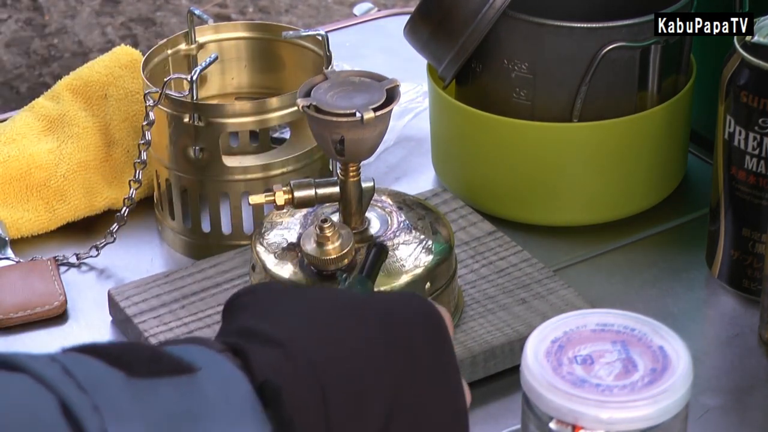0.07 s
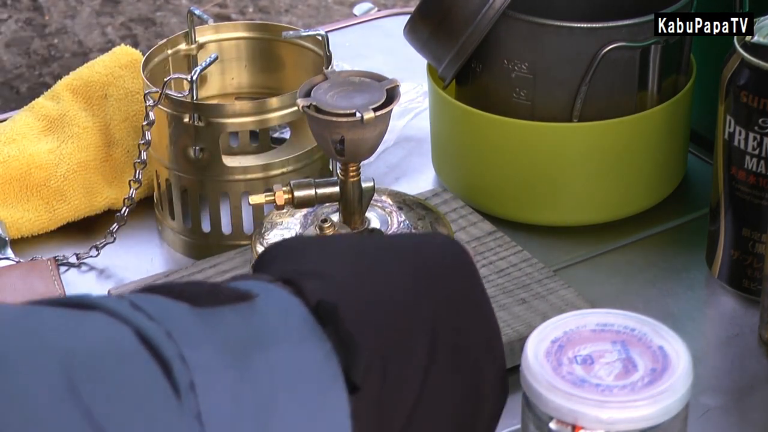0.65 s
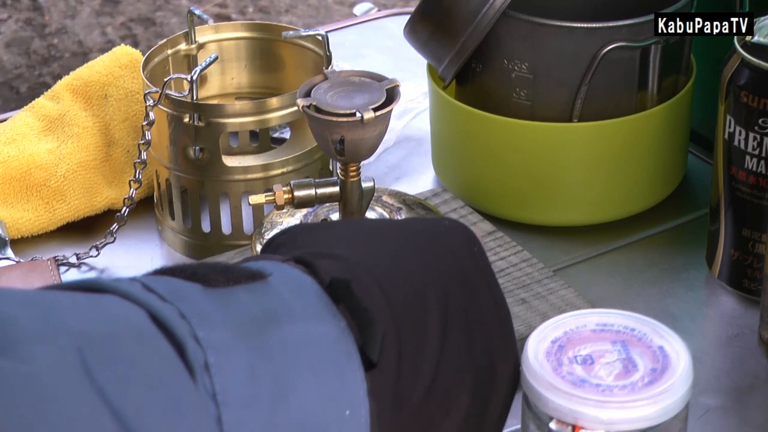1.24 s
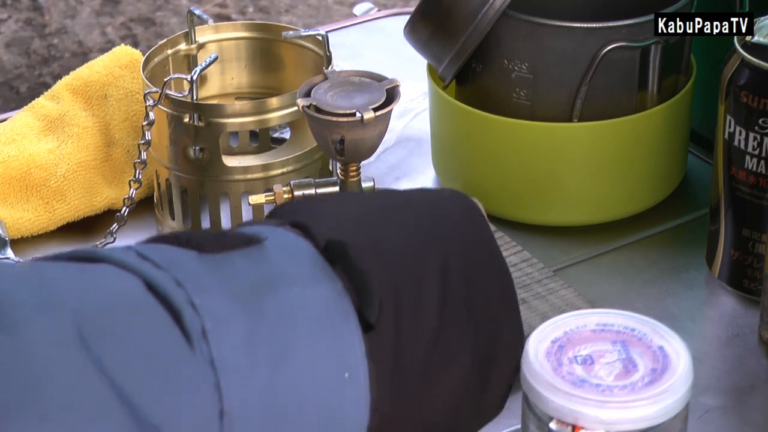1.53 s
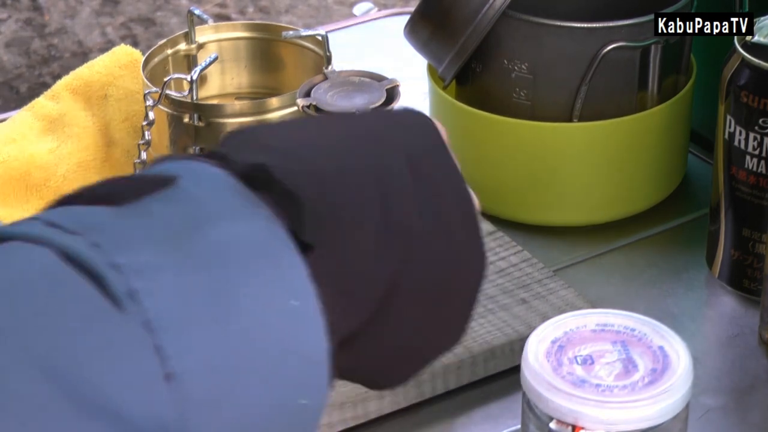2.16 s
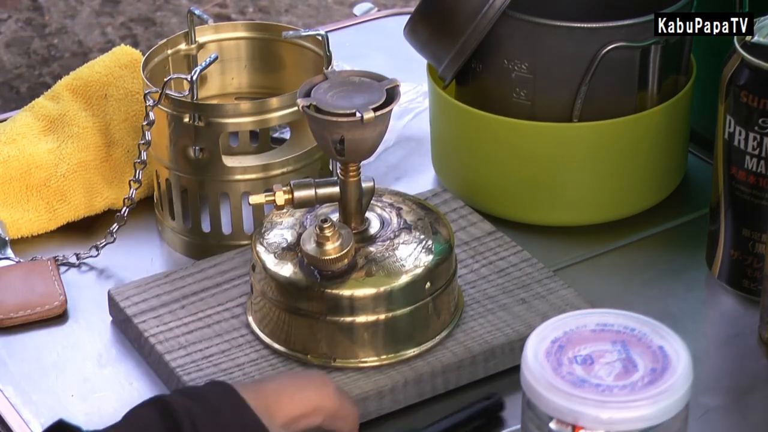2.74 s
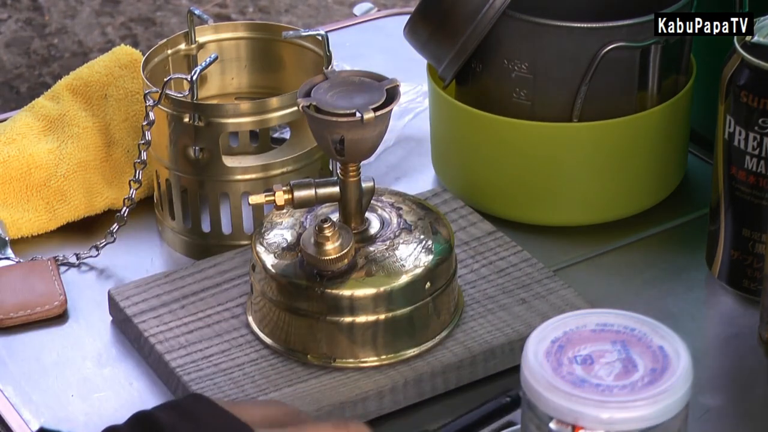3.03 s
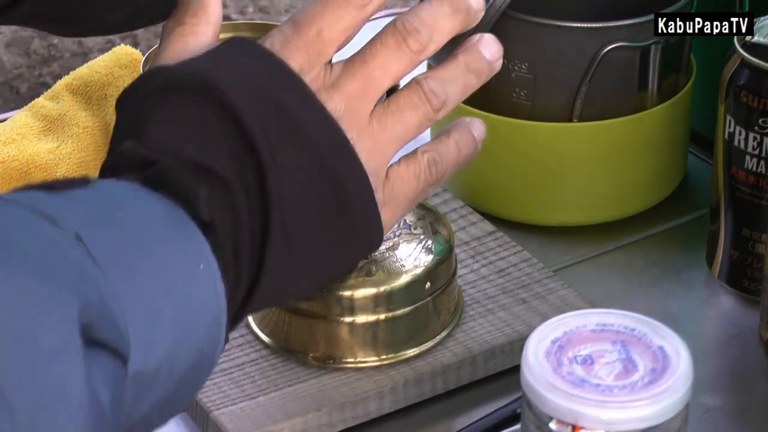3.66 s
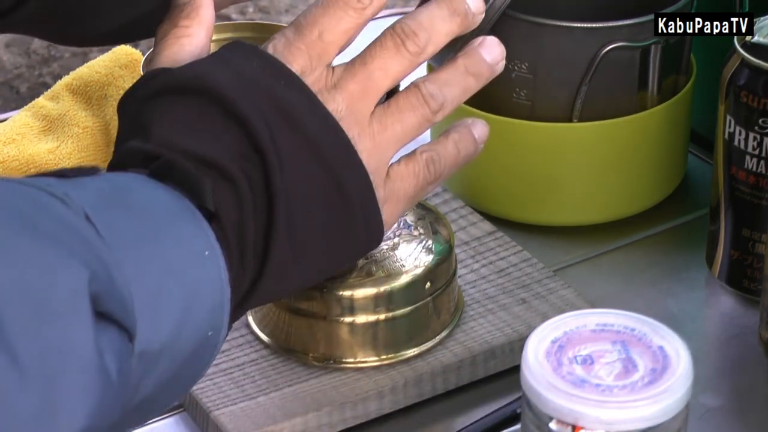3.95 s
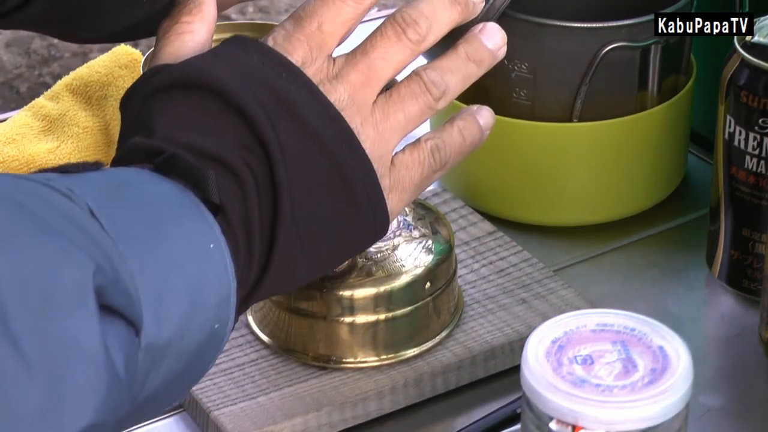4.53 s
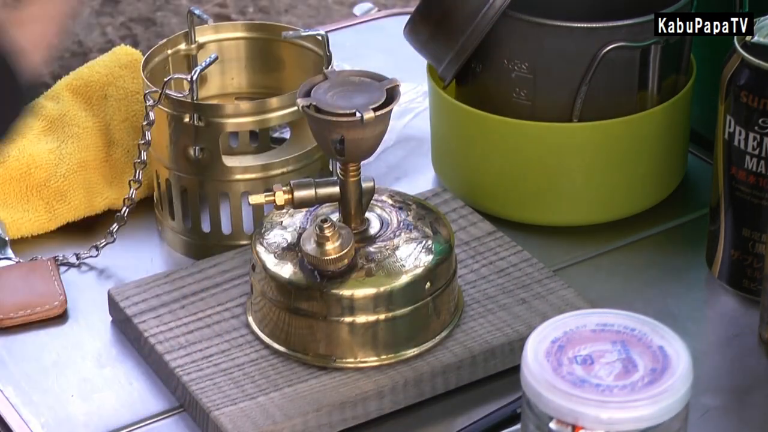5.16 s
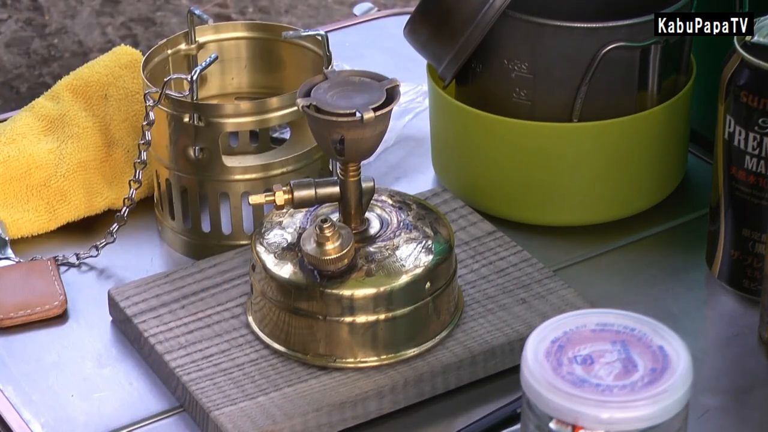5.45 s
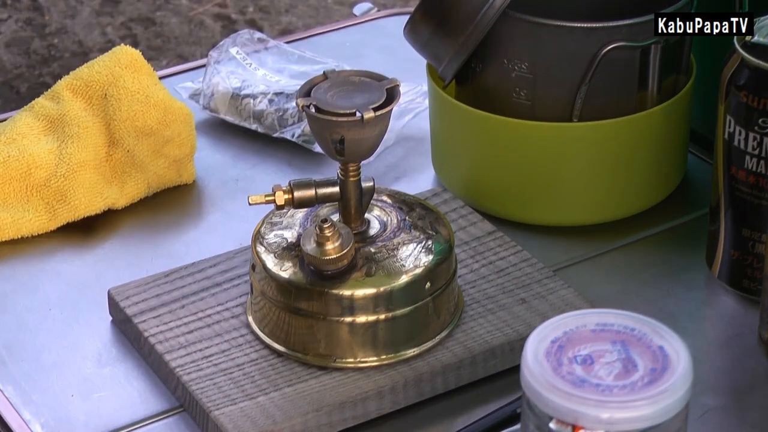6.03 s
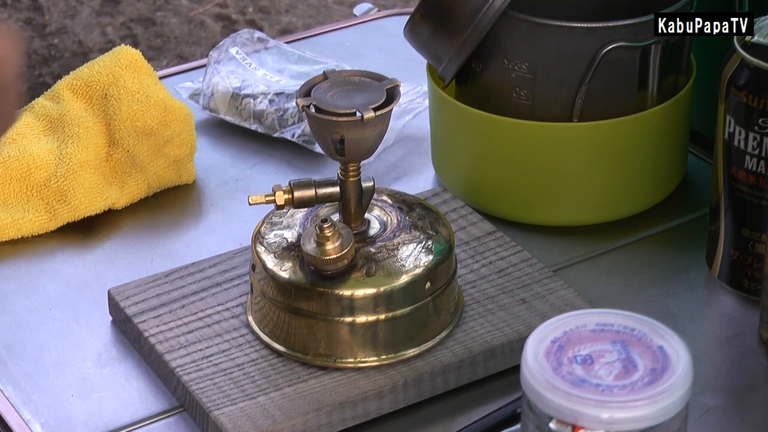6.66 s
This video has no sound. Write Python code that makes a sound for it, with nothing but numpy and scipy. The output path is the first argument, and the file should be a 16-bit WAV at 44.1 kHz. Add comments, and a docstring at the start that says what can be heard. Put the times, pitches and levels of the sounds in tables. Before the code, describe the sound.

Light metal taps, one sharp lighter click, plastic clattering onto a table and close sleeve rustling, with steady low outdoor air behind.

```python
"""Outdoors, at a table with a brass camping stove, a low, steady rush lies under everything.
A long plastic lighter tinks against the burner with its metal nozzle, snaps once as its hammer strikes,
and later its trigger springs back. It is put down, slid along and let go, and a few knocks make the
table ring. A jacket sleeve swishes, cloth rubbing on cloth, with each reach of the arm.
It all sounds close by and almost the same in both ears."""
import sys
import numpy as np
from scipy import signal
from scipy.fft import rfft, irfft, next_fast_len
from scipy.io import wavfile

SR = 44100
rng = np.random.default_rng(int(sys.argv[2]) if len(sys.argv) > 2 else 0)


def file_out(sig):
    """Save sig as 16-bit WAV at sys.argv[1]."""
    # one column per channel
    cols = np.atleast_2d(sig).T
    # limit, then scale
    lim = np.clip(cols, -1, 1)
    pcm = np.round(lim * 32767).astype(np.int16)
    wavfile.write(sys.argv[1], SR, pcm)


N = 303849
TIME = np.arange(N) / SR
HIT_TIME = TIME[:SR // 2]  # half a second for each hit to ring out


def amp(db):
    """Turns decibels into a number to multiply a sound by."""
    return 10 ** (np.asarray(db) / 20)


def unit(x):
    """Scales a signal so that its average strength (rms) is 1."""
    return x / np.sqrt(np.mean(x ** 2) + 1e-20)


def level_at(spectrum, hz):
    """Reads the level in dB at any pitch from rows of pitch_hz, level_db."""
    pitches, levels = np.transpose(spectrum)
    return np.interp(np.log(hz + 1), np.log(pitches + 1), levels)


def add(mix, start_s, sound):
    """Lays a sound into the mix at its start time."""
    part = mix[round(start_s * SR):][:len(sound)]
    part += sound[:len(part)]


def noise(spectrum, size, tilt_db=0):
    """Noise shaped by a spectrum; a positive tilt, in dB per octave, makes it brighter."""
    padded = next_fast_len(size, True)
    hz = np.fft.rfftfreq(padded, 1 / SR)
    octaves = np.log2(np.maximum(hz, spectrum[1][0]))
    gain = amp(level_at(spectrum, hz) + tilt_db * octaves)
    return unit(irfft(rfft(rng.standard_normal(padded)) * gain, padded)[:size])


def band(pitch_hz, half_width_hz):
    """Noise gathered around one pitch: the narrower it is, the more it sounds like a note."""
    padded = next_fast_len(N, True)
    hz = np.fft.rfftfreq(padded, 1 / SR)
    peak = 1 / (1 + ((hz - pitch_hz) / half_width_hz) ** 2)
    return unit(irfft(rfft(rng.standard_normal(padded)) * peak, padded)[:N])


def wobble(rate_hz):
    """A curve that wanders up and down at random, faster at a higher rate."""
    points = rng.standard_normal(N // 16)
    return unit(np.interp(2 * rate_hz * TIME, np.arange(len(points)), points))


def dying(fade_s):
    """A fade that falls by 60 dB in fade_s seconds."""
    return np.exp(-np.log(1000) * HIT_TIME / max(fade_s, 1e-4))


def ring(tones, fade_scale=1, spread_db=2.5):
    """A struck thing rings with its own tones; where it is hit sets each one's sign and strength."""
    out = np.zeros(len(HIT_TIME))
    for hz, db, fade_s in tones:
        strength = rng.choice([-1, 1]) * amp(db + spread_db * rng.standard_normal())
        out += strength * dying(fade_s * fade_scale) * np.sin(2 * np.pi * hz * HIT_TIME)
    return out


def burst(spectrum, fade_s, tilt_db=0):
    """A dying puff of noise whose energy depends only on how long it lasts."""
    fade = dying(fade_s)
    return unit(noise(spectrum, len(fade), tilt_db) * fade) * np.sqrt(np.mean(fade ** 2))


# The tone colour of the outdoor air: pitch_hz, level_db
AIR_SPECTRUM = [(12, -24), (25, -2.5), (55, 0), (120, -3.5), (180, -6.5), (270, -9.5), (420, -13),
                (720, -12.5), (980, -14.5), (1500, -23.5), (3000, -30.5), (6000, -35.5), (10000, -38.5),
                (16000, -42)]
# Two low hums: pitch_hz, half_width_hz, level_db
DRONES = [(94, 12.5, -55.5), (212.7, 9.1, -57)]
# How the first, nearest hum swells and fades: time_s, change_db
DRONE_SWELL = [(0, 2), (.9, 5), (1.35, 7.5), (2.2, -3.5), (3.4, 3), (4.2, 6.5), (5.2, 8), (5.9, -5),
               (6.9, -3)]

def air(rush_db=-42.5, waver_db=0.5):
    """A far-off rush that wavers a little, with two low hums in it."""
    drones = [amp(db) * band(hz, half_width) for hz, half_width, db in DRONES]
    drones[0] *= amp(np.interp(TIME, *np.transpose(DRONE_SWELL)))
    rush = amp(rush_db + waver_db * wobble(4.2)) * noise(AIR_SPECTRUM, N)
    return rush + sum(drones)


def side_hiss(level_db=-72.5):
    """A very faint hiss that gives the air a little width."""
    spectrum = [(30, 11), (120, -3), (400, 1), (1200, -21), (2500, -13),
                (4500, -0.5), (8000, 9.5), (14000, 12), (16000, 6)]
    return amp(level_db) * noise(spectrum, N)


def gear_echo(sound, echo_db=-25, fade_s=0.45):
    """Sound bounces off nearby pots and gear, which adds a faint, short tail."""
    spectrum = [(100, 7), (3000, -1.5), (8000, -7.5), (16000, -9)]
    build_up = 1 - dying(0.027)
    tail = noise(spectrum, len(HIT_TIME)) * dying(fade_s) * build_up
    return sound + amp(echo_db) * signal.fftconvolve(sound, tail / np.linalg.norm(tail))[:N]


def table_echo(sound, strength=0.22, delay_s=0.001404, sway=0.227):
    """The sleeve's sound bounces off the table; the path shifts as the arm moves, and so does the tone."""
    moving_delay_s = delay_s * np.exp(sway * wobble(1.5))
    echo = np.interp(TIME - moving_delay_s, TIME, sound)
    return (sound + strength * echo) / np.sqrt(1 + strength ** 2)


def swish(full_speed_s, rise_s, hold_s, fall_s, drop_db=17.5, curve=1.3):
    """The loudness of a short reach: the arm speeds up, glides and slows down."""
    before = np.maximum(full_speed_s - TIME, 0) / rise_s
    after = np.maximum(TIME - full_speed_s - hold_s, 0) / fall_s
    return amp(-drop_db * np.minimum(before + after, 2) ** curve)


def pull(times_s, levels_db, fade_db_per_s=450):
    """The loudness of a longer move: it follows the given levels and fades fast at both ends."""
    outside_s = abs(TIME - np.clip(TIME, times_s[0], times_s[-1]))
    return amp(np.interp(TIME, times_s, levels_db) - fade_db_per_s * outside_s)


# Short reaches of the arm: full_speed_s, rise_s, hold_s, fall_s, rub_db, hiss_db
SWISHES = [(0, .1, 0.37, 0.35, -50.5, -57.5), (0.366, 0.12, 0.12, 0.28, -48.5, -57),
           (0.637, 0.15, 0.095, 0.33, -45.5, -58), (1.535, 0.028, 0.0088, 0.041, -50, -72),
           (1.65, .08, 0.13, 0.29, -52.5, -70), (1.96, 0.037, .01, 0.026, -51.5, -70),
           (2.555, 0.12, 0.044, 0.12, -46, -56), (2.784, 0.27, 0.084, 0.086, -41.5, -50),
           (2.95, .1, 0.23, 0.17, -54.5, -58.5), (3.599, 0.16, 0.043, 0.25, -44.5, -46),
           (6.648, 0.095, .03, 0.34, -44, -46.5), (6.719, 0.042, 0.016, 0.12, -40.5, -55),
           (6.858, 0.12, .03, .1, -52, -48.5)]
# The arm pulls away from the stove: time_s, level_db
PULL_AWAY = [(2.06, -46), (2.254, -36), (2.302, -27.5), (2.354, -26), (2.456, -37.5), (2.47, -51)]
# The arm lifts the windscreen off: time_s, rub_db, hiss_db
LIFT_OFF = [(4.88, -60, -60.5), (5.074, -43, -48.5), (5.18, -41, -49), (5.328, -43.5, -47.5),
            (5.364, -36.5, -50), (5.462, -42, -46.5), (5.522, -38.5, -45), (5.746, -44.5, -46),
            (5.81, -52.5, -59)]

def arm(away_rub_db=-1, away_hiss_db=-13):
    """All the arm's moves together set how loudly the sleeve rubs and hisses at each moment."""
    away = pull(*np.transpose(PULL_AWAY))
    lift_s, lift_rub_db, lift_hiss_db = np.transpose(LIFT_OFF)
    rubs = [amp(away_rub_db) * away, pull(lift_s, lift_rub_db)]
    hisses = [amp(away_hiss_db) * away, pull(lift_s, lift_hiss_db)]
    for *timing, rub_db, hiss_db in SWISHES:
        speed = swish(*timing)
        rubs.append(amp(rub_db) * speed)
        hisses.append(amp(hiss_db) * speed)
    return np.linalg.norm(rubs, axis=0), np.linalg.norm(hisses, axis=0)


# The tone colour of rubbing cloth: pitch_hz, level_db
RUB_SPECTRUM = [(100, -24), (250, 1.5), (480, -1.5), (870, 2.5), (1150, -1), (1550, -0.5), (2000, -3.5),
                (3100, -5.5), (5000, -14.5), (9000, -24.5), (16000, -47)]
# The tone colour of its fine hiss: pitch_hz, level_db
HISS_SPECTRUM = [(1000, -23), (3000, -3), (5000, 0.5), (8000, -4), (10500, -9.5), (13000, -14.5),
                 (16000, -21.5)]
# Pitches that the folds boost or soften in a fast stroke: pitch_hz, width_hz, change_db
FOLDS = [(960, 150, 9), (1420, 260, 10), (2800, 160, 6.5), (300, 450, -12.5), (3200, 590, -3.5)]

def sleeve(slow_db=2.5, fast_db=2, fast_above_db=-35, blend_db=3, grain_db=-0.3, catch_db=1):
    """Cloth slides on cloth: threads catch unevenly, and a fast stroke sounds the hollow folds."""
    rub_gain, hiss_gain = arm()
    hz = np.geomspace(50, SR / 2, num=400)
    folds_db = sum(db / (1 + (2 * (hz - pitch) / width) ** 2) for pitch, width, db in FOLDS)
    hollow_spectrum = np.c_[hz, level_at(RUB_SPECTRUM, hz) + folds_db]
    # A louder stroke counts as a faster one: 0 is slow, 1 is fast.
    fast_share = 1 / (1 + np.exp((fast_above_db - 20 * np.log10(rub_gain)) / blend_db))
    slow_rub = amp(slow_db) * np.sqrt(1 - fast_share) * noise(RUB_SPECTRUM, N)
    fast_rub = amp(fast_db) * np.sqrt(fast_share) * noise(hollow_spectrum, N)
    threads = unit(amp(grain_db * wobble(420) + catch_db * wobble(40)))
    cloth = rub_gain * (slow_rub + fast_rub) + hiss_gain * noise(HISS_SPECTRUM, N)
    return table_echo(threads * cloth)


# How loud the lighter is as it slides on the table: time_s, level_db
SLIDE_LEVELS = [(2.64, -75), (2.655, -43), (2.69, -43), (2.73, -50), (2.8, -38.5), (2.86, -58), (2.9, -80)]
# The pitches at which its tube sings: pitch_hz, width_hz, level_db
TUBE_TONES = [(1390, 700, 1), (2920, 54, 4), (4250, 380, -2.5), (5100, 770, -3.5), (7040, 210, -7),
              (8270, 350, -7), (10900, 980, -13.5), (14300, 1500, -19)]

def slide(waver_db=4, slips_per_s=650, slip_db=2, slip_fade_s=0.0224):
    """Tiny slips keep the lighter's tube singing as it is pushed along, now one pitch, now another."""
    song = unit(sum(amp(db + waver_db * wobble(25)) * np.sqrt(width) * band(hz, width / 2)
                    for hz, width, db in TUBE_TONES))
    slip_starts = rng.random(N) < slips_per_s / SR
    slips = slip_starts * amp(slip_db * np.minimum(rng.exponential(1, N), 4))
    # Energy is the signal squared, so it fades in half the time.
    energy = signal.oaconvolve(slips ** 2, dying(slip_fade_s / 2))[:N]
    roughness = unit(np.sqrt(abs(energy)))
    level_db = np.interp(TIME, *np.transpose(SLIDE_LEVELS), left=-120, right=-120)
    return song * roughness * amp(level_db)


def bounces(start_s, count, first_gap_s=0.013, gap_scale=0.875, drop_db=-8.5, pitch_scale=0.66):
    """A hit, then duller bounces that come ever sooner and softer: start_s, change_db, pitch_scale."""
    yield start_s, 0, 1
    for k in range(count):
        start_s += first_gap_s * gap_scale ** k
        yield start_s, drop_db - k, pitch_scale  # each further bounce is 1 dB softer


# Knocks on the table: start_s, thud_db, pitch_hz, clatter_db, clatter_tilt_db_per_octave, bounce_count
KNOCKS = [(2.152, -33.5, 405, -53, -6, 0), (2.6422, -33, 1480, -26.5, 0, 0),
          (2.647, -23.5, 275, -25, -2, 0), (2.8632, -26, 360, -32.5, -2.5, 0),
          (2.8655, -26, 1000, -40, 1, 1), (3.055, -34.5, 1960, -31.5, -14, 0),
          (3.1347, -55, 2000, -42.5, 0, 0), (3.1489, -23, 1210, -32, 2, 0),
          (3.1584, -18, 450, -24.5, -1.7, 6), (5.074, -28.5, 560, -43, -6, 1), (5.409, -29, 380, -45, 0, 0),
          (5.543, -31, 520, -38, -4, 0)]
# The tones of the table top: pitch_hz, level_db, fade_s
TABLE_TONES = [(135, -7, 0.17), (177, -15, 0.16), (224.4, -4.5, 0.27), (331, 2, 0.055), (451, -4, 0.047),
               (542.4, 0, 0.072), (634, -6.5, 0.072), (896, -7, 0.075), (1040, -1.5, 0.08),
               (1382, -4.5, 0.11), (1510, -9, 0.17), (1700, -5.5, .07), (1920, -8, 0.1), (2280, 1, 0.051)]
# The tone colour of plastic clattering on it: pitch_hz, level_db
CLATTER_SPECTRUM = [(200, -10), (1000, 2), (1700, -1), (2250, 5.5), (2900, 2), (4500, 0.5), (6000, -2),
                    (8500, -3), (11000, -4.5), (13500, -16), (16000, -24)]

def table_knocks(ring_db=-4, focus_db=5, bump_db=-7, bump_fade_s=0.11, clatter_fade_s=0.053):
    """Each knock wakes the table's tones near its own pitch, while the plastic clatters on top."""
    out = np.zeros(N)
    for first_s, thud_db, pitch_hz, clatter_db, tilt_db, bounce_count in KNOCKS:
        for start_s, change_db, pitch_scale in bounces(first_s, bounce_count):
            hit_hz = pitch_hz * pitch_scale
            tones = [(hz, db - focus_db * np.log2(hz / hit_hz) ** 2, fade_s)
                     for hz, db, fade_s in TABLE_TONES]
            bump_spectrum = [(hit_hz / 10, -18), (hit_hz, 0), (hit_hz * 2, -7), (hit_hz * 20, -55)]
            bump = amp(bump_db) * burst(bump_spectrum, bump_fade_s)
            thud = amp(thud_db) * (amp(ring_db) * ring(tones) + bump)
            clatter = amp(clatter_db) * burst(CLATTER_SPECTRUM, clatter_fade_s, tilt_db)
            add(out, start_s, amp(change_db) * (thud + clatter))
    return out


# The metal nozzle touches the burner: start_s, level_db, fade_scale (above 1 rings longer)
TINKS = [(0.4103, -35.5, 1.2), (0.509, -48.5, 1), (0.628, -35, 1.3), (.6964, -36, 0.83), (.8021, -47, .4),
         (.9059, -43.5, 0.96), (.9373, -50.5, .7), (.947, -48, .6), (1.1262, -41, 0.8)]
# The tones of the nozzle: pitch_hz, level_db, fade_s
NOZZLE_TONES = [(3410, -13, .045), (3670, -10, 0.11), (4540, -9, 0.088), (5160, -11, 0.058),
                (6100, -0.5, 0.084), (6380, -2, 0.13), (7260, -5, .055), (8350, -13, 0.074),
                (8800, -8, .04), (9170, -8, 0.027), (11850, -22, .09)]
# The tone colour of the lighter's clicks, both tinks and snaps: pitch_hz, level_db
CLICK_SPECTRUM = [(150, -43), (400, -30), (1300, -34), (1660, -14), (2000, 0), (5100, 8.5), (6000, -4),
                  (7100, 6), (9600, 4.5), (11500, -7), (14000, -2), (16500, -31)]

def nozzle_tinks(tick_db=-1, tick_fade_s=0.04, pitch_spread=0.0081):
    """Metal taps metal: a tick and a high ring, a little different at each spot that is touched."""
    out = np.zeros(N)
    for start_s, level_db, fade_scale in TINKS:
        tones = [(hz * (1 + pitch_spread * rng.standard_normal()), db, fade_s)
                 for hz, db, fade_s in NOZZLE_TONES]
        metal = ring(tones, fade_scale, spread_db=-0.5)
        tick = amp(tick_db) * burst(CLICK_SPECTRUM, tick_fade_s, tilt_db=-0.5)
        add(out, start_s, amp(level_db) * (metal + tick))
    return out


# The snap, then the trigger's return: start_s, level_db, tilt_db_per_octave, ring_share
SNAPS = [(1.0056, -9.5, -6, 0.63), (1.0074, -3, 2.5, 0.71), (1.0112, -20, -11, 0.49), (1.019, -22.5, 2, .5),
         (1.026, -30, 3, .5), (2.132, -25, 0, 0.6), (2.134, -21.5, 3.5, 0.63), (2.14, -36, 4, .5)]
# The tones of the plastic case: pitch_hz, level_db, fade_s
CASE_TONES = [(2097, -2.5, 0.045), (2556, 7, 0.029), (2920, -10.5, .045), (3490, 0, 0.059), (4320, -8, .04),
              (4100, -9, 0.067), (4940, -4, 0.034), (5180, 1, 0.035), (5400, 0, 0.028), (6080, -9, 0.064),
              (7020, -2, 0.069), (8400, -14, 0.028), (8870, 0, .035), (9500, 1, 0.05), (10000, -2, .042),
              (11100, -4, 0.051)]

def lighter_snaps(case_db=-19, crack_fade_s=0.008, rattle_db=-22, rattle_fade_s=0.072):
    """A spring hammer strikes and later the trigger springs back; the case rings and its parts rattle."""
    out = np.zeros(N)
    for start_s, level_db, tilt_db, ring_share in SNAPS:
        crack = burst(CLICK_SPECTRUM, crack_fade_s, tilt_db)
        rattle = amp(rattle_db) * burst(CLICK_SPECTRUM, rattle_fade_s, tilt_db)
        case = ring_share * amp(case_db) * ring(CASE_TONES)
        add(out, start_s, amp(level_db) * (crack + rattle + case))
    return out


def scene():
    """Everything sits in the middle; only a faint hiss differs between the ears."""
    middle = air() + sleeve() + slide()
    middle += gear_echo(lighter_snaps() + nozzle_tinks() + table_knocks())
    side = side_hiss()
    return np.array([middle + side, middle - side])


def record(dry, cutoff_hz=15900):
    """Rounds off the loudest peaks, then takes away the very highest treble."""
    rounded = np.tanh(dry)
    low_pass = signal.firwin(511, cutoff_hz, window=("kaiser", 9), fs=SR)
    return signal.oaconvolve(rounded, low_pass[None], "same")


dry = scene()
out = record(dry)
file_out(out)
```